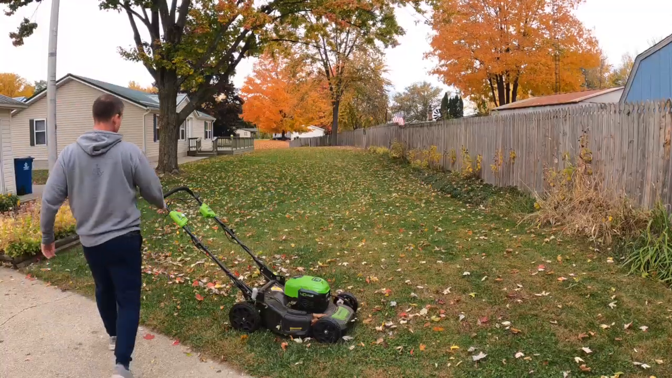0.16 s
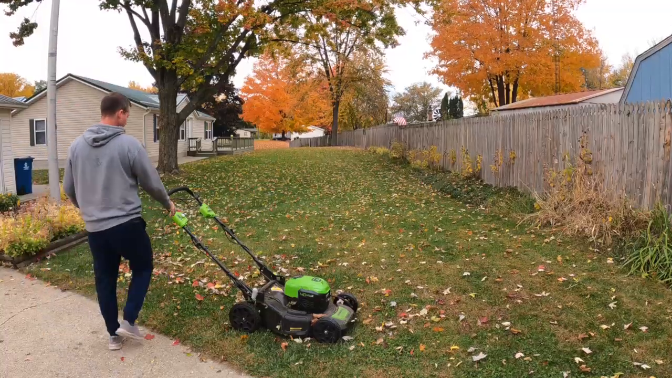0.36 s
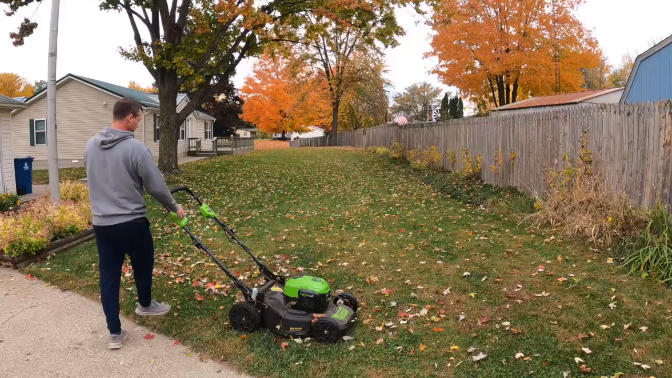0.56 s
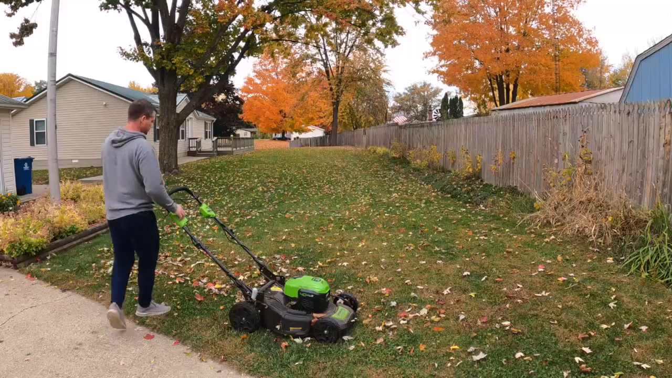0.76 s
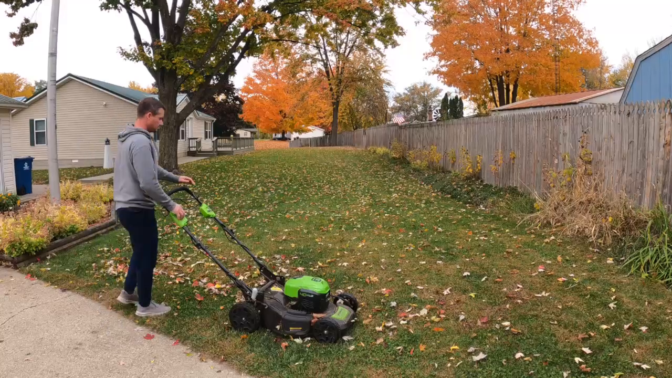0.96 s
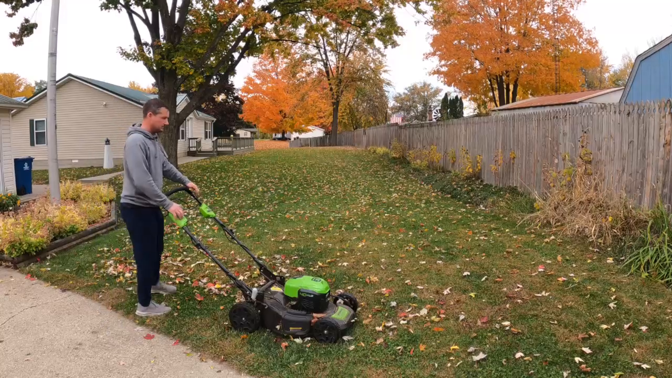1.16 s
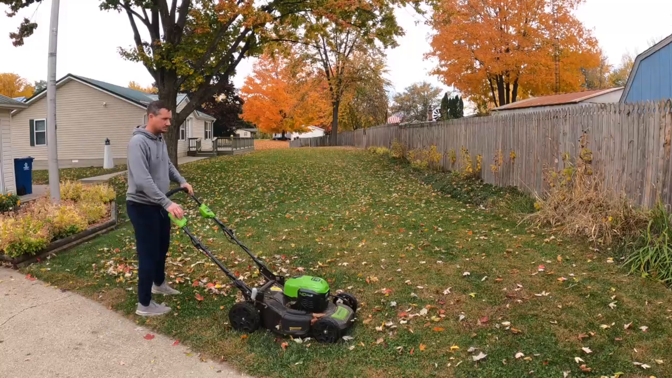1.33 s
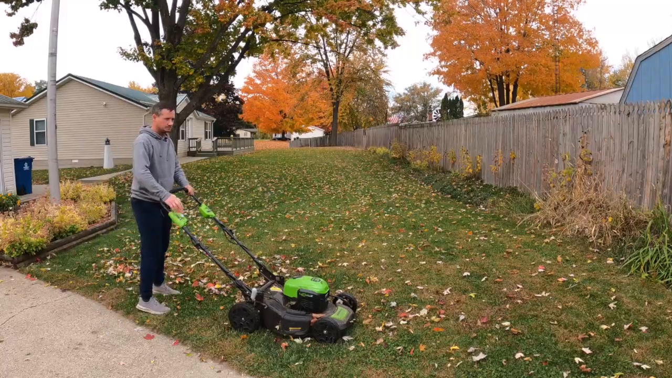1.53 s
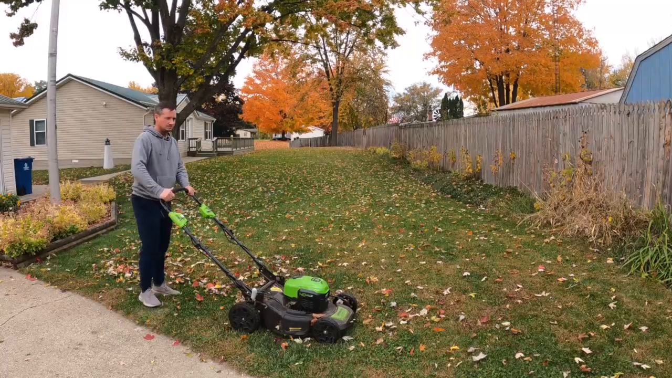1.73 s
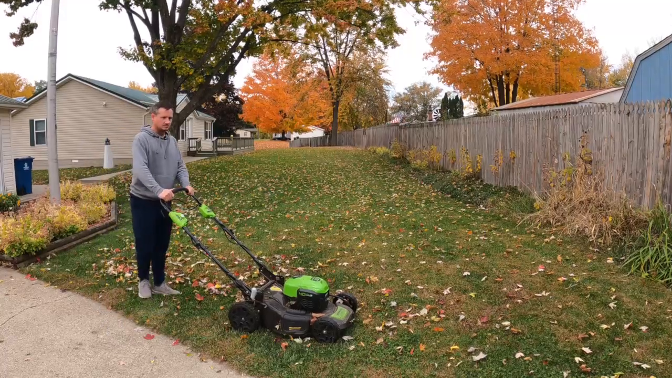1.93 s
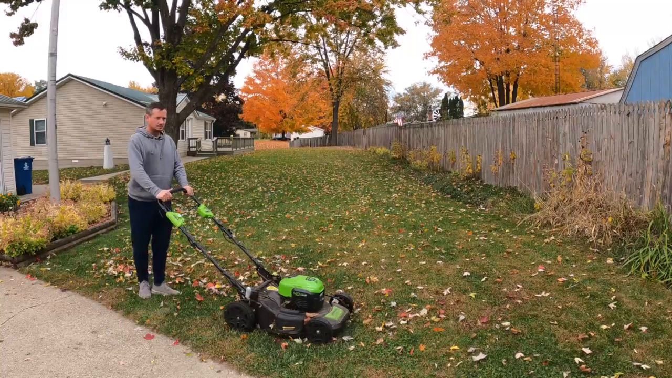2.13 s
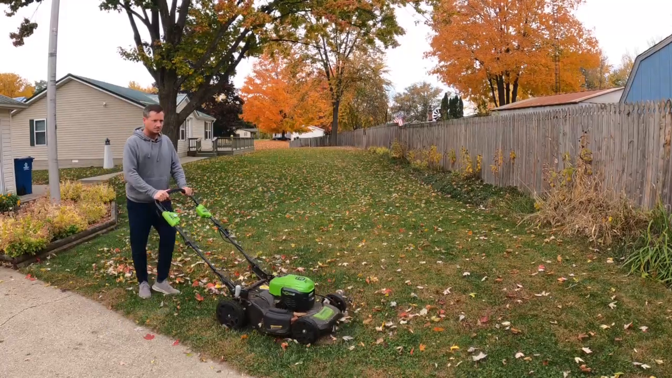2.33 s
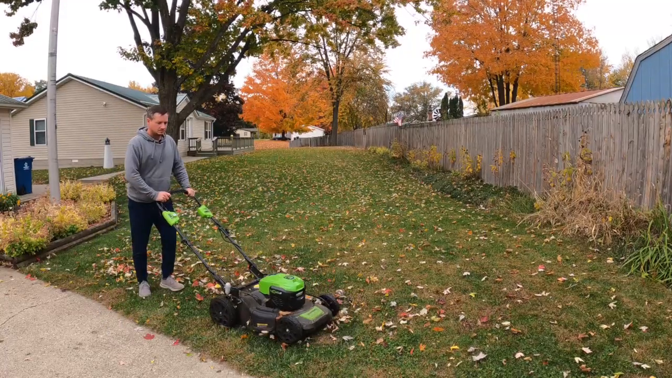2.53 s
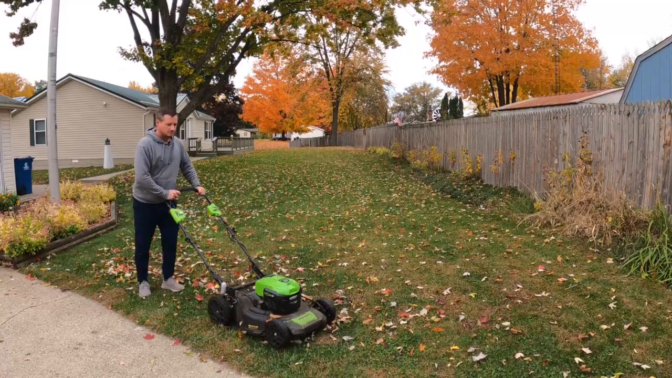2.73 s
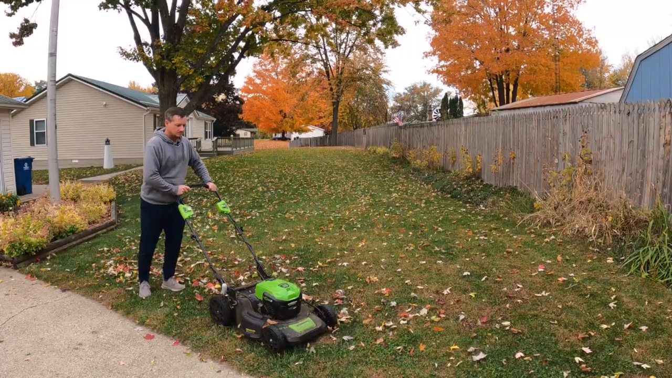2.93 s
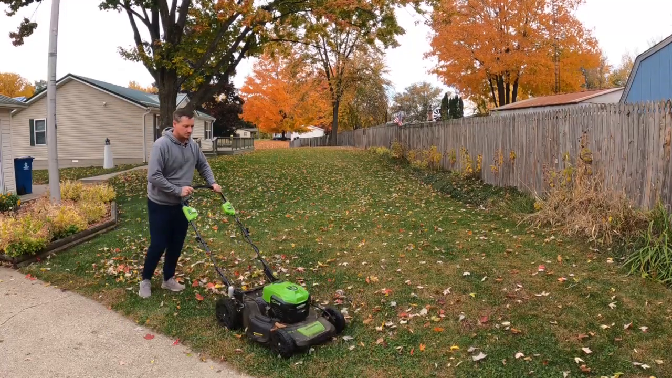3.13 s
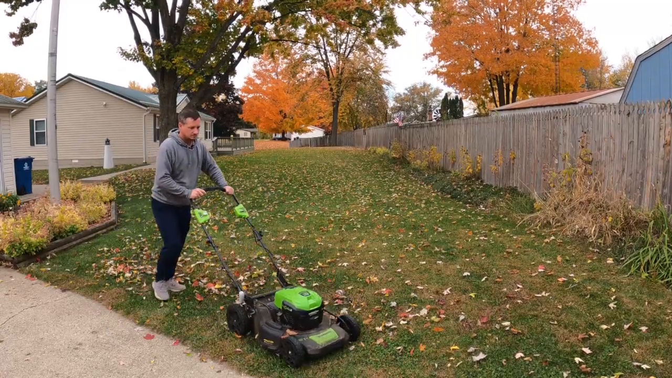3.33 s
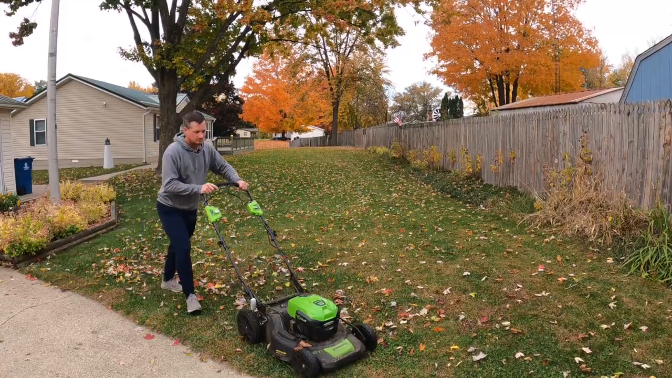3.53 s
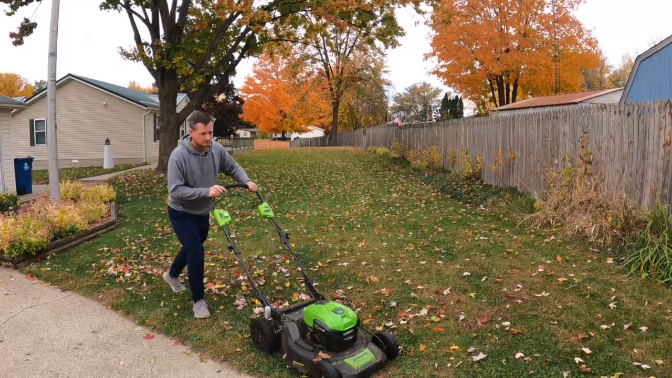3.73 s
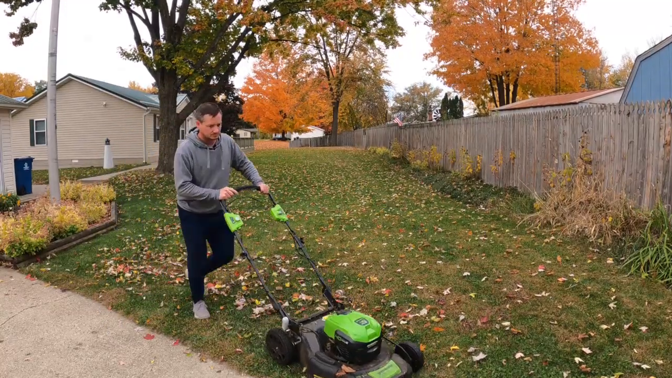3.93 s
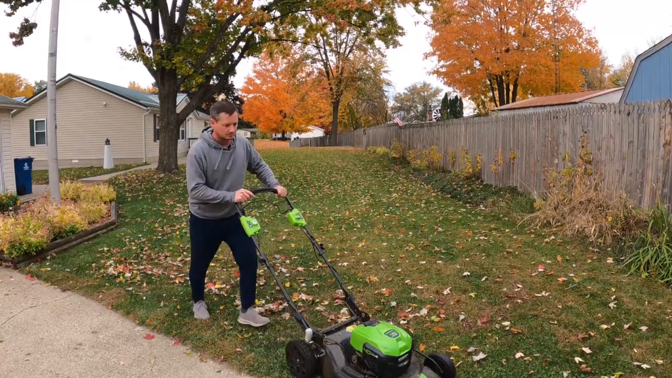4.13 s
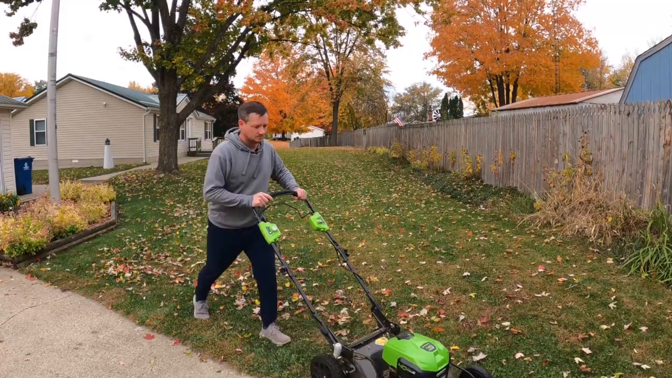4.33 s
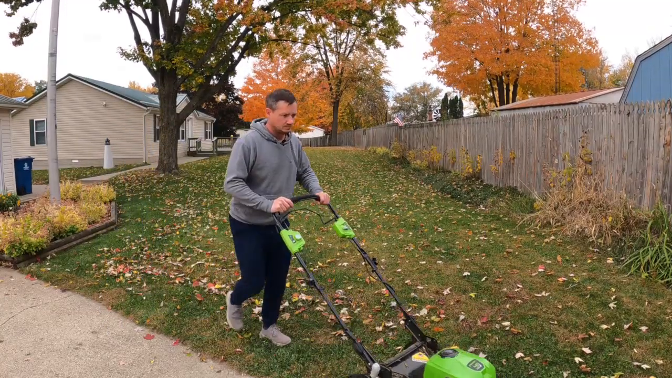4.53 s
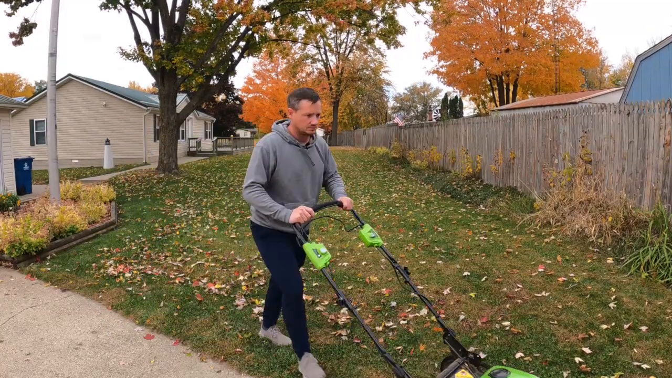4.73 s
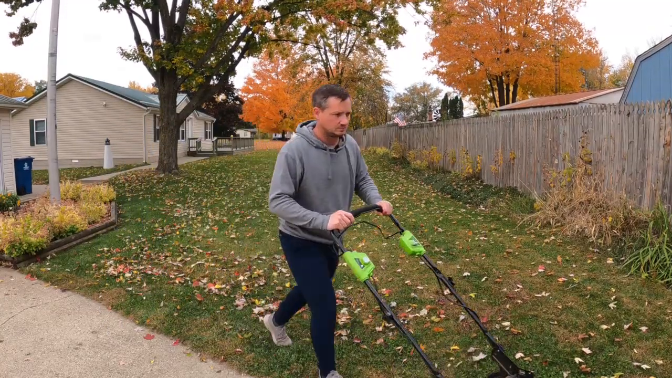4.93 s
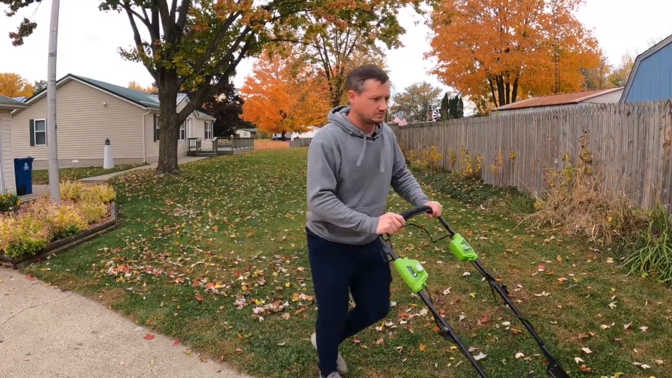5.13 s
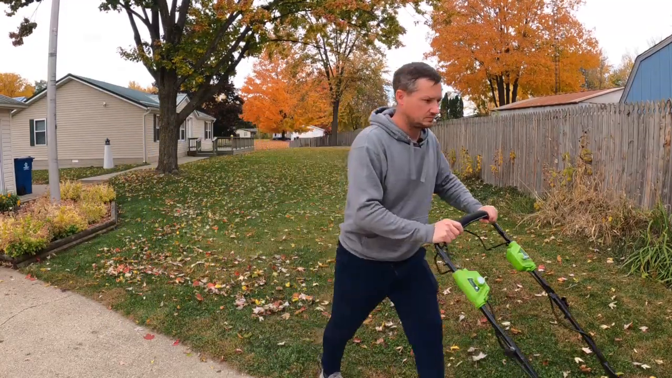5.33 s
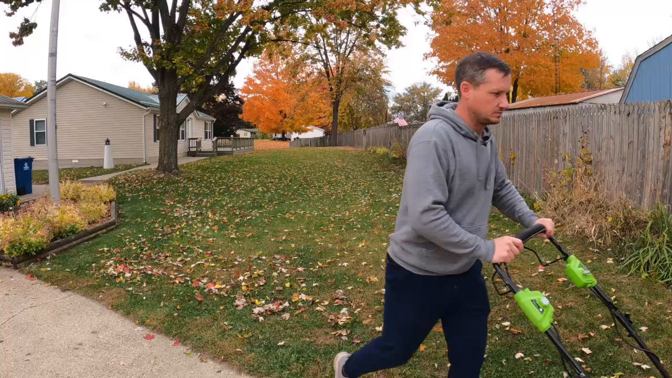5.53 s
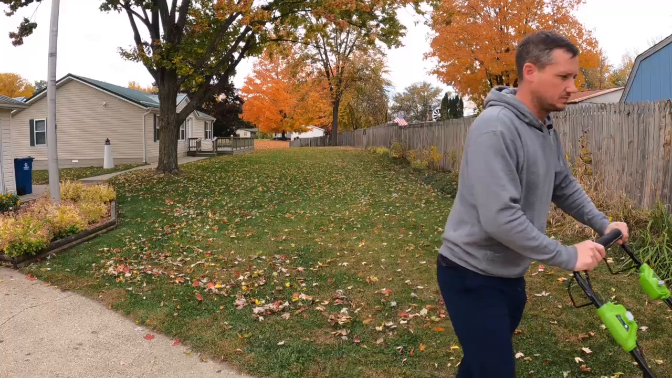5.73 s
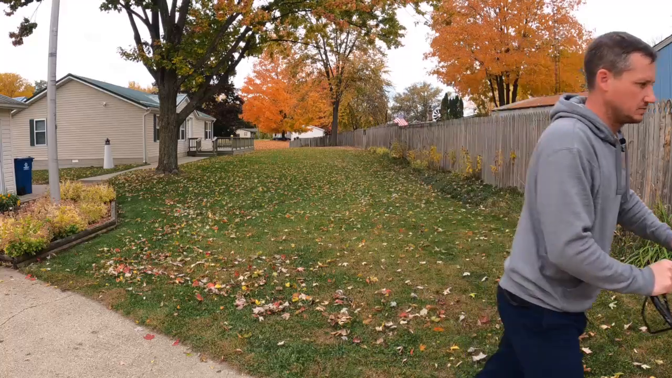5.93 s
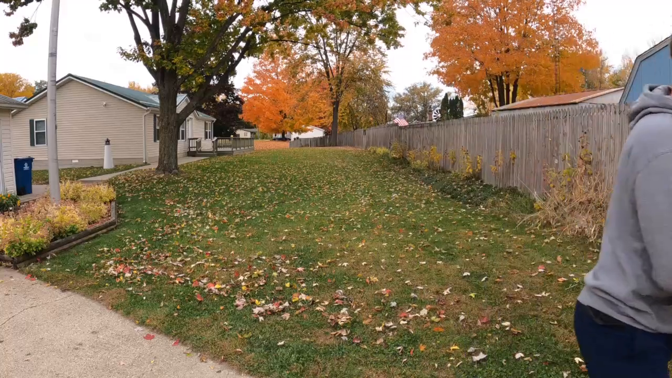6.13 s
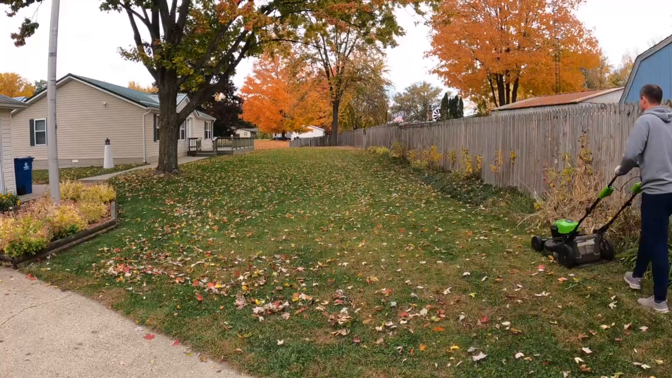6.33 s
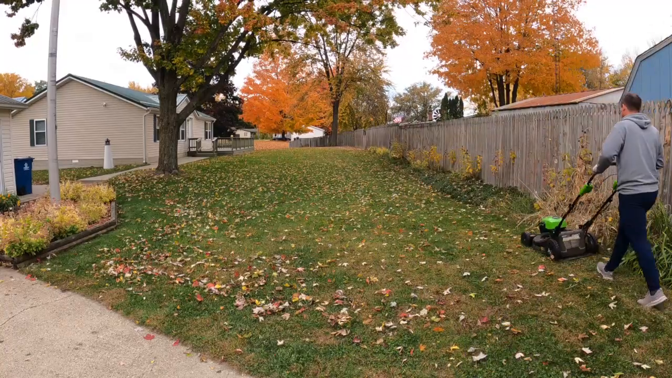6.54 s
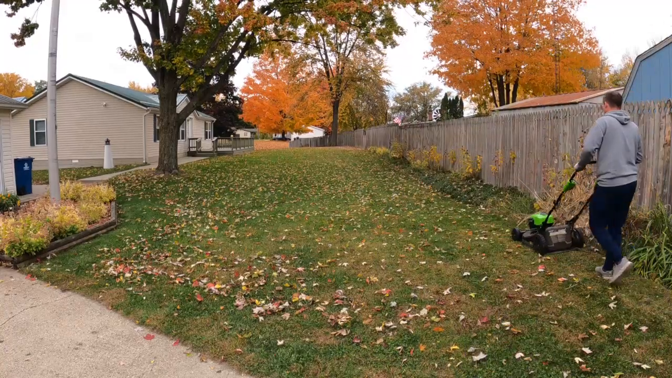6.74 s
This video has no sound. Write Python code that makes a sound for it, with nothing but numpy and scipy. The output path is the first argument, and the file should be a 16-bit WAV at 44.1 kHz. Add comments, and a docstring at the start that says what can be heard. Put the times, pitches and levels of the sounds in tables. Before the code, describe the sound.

A quiet outdoor hush with soft low rumbles opens the scene. A shoe scuffs a gritty path right at the start, and another lands with a tiny squeak at about 0.9 seconds. A mower handle gives a few faint ticks, then a cluster of sharper clicks around 1.4 to 1.7 seconds. From about 2 seconds a battery lawn mower starts with a pulsing whirr and a faint, very high whine. Dry leaves begin to rattle and snap at around 2.7 seconds. From 3 seconds a low hum sets in, rising in pitch and loudness with a rush of air until it levels off near 5 seconds. The mower runs loudest close to the microphone, with constant crackling and sharp cracks of leaves and twigs. At about 6.2 seconds it abruptly sounds a little farther off, still humming and chopping until the end, near 6.8 seconds.

```python
"""Battery mower on a leafy lawn

Over low rumbles and a neighbourhood hush, two steps scuff the path and the handle bail clicks. The motor whines
and the blade spins up: it hums at its passing rate, drives turbulent air under the deck and chops dry leaves.
The mower rolls past a low microphone; at 6.24 s its sound changes abruptly."""
import sys
import numpy as np
from scipy import signal
from scipy.io import wavfile
from scipy.ndimage import uniform_filter1d

SR = 44100
rng = np.random.default_rng(int(sys.argv[2]) if len(sys.argv) > 2 else 0)


def master(y):
    """Save y as 16-bit WAV."""
    cut = np.clip(np.atleast_2d(y).T, -1, 1)
    pcm = np.round(cut * 32767)  # scale
    wavfile.write(sys.argv[1], SR, pcm.astype(np.int16))


N = 298989
TIME = np.arange(N) / SR

# The running mower, one table before and one after the abrupt change at 6.24 s. Each row: time in seconds,
# blade passing rate in Hz, levels in dB of the second harmonic, the third harmonic and the air rush.
MOWER = [
    [(1.9, 8, -80, -80, -69.5), (2.3, 15, -75, -75, -54), (2.65, 26, -65, -65, -44.5),
     (2.85, 27.5, -60, -58, -37.5), (3.12, 43.3, -52, -54, -36.5), (3.27, 50.5, -51.5, -41, -34.5),
     (3.52, 61.8, -40, -36, -32), (3.7, 65.7, -36.5, -32, -30.5), (3.9, 74.4, -37, -31.5, -30.5),
     (4.3, 83.4, -28.5, -26, -28.5), (4.75, 90.7, -24, -30.5, -27), (5.1, 92.6, -22.5, -28.5, -27.5),
     (5.45, 94.3, -22.5, -32, -25), (5.85, 94.8, -23.5, -33, -27), (6.236, 96.2, -25.5, -31.5, -25.5)],
    [(6.244, 93.6, -29, -26.5, -28), (6.5, 94.6, -27, -25.5, -26), (6.6, 94.3, -31, -24.5, -26.5),
     (6.78, 94, -27, -26.5, -27.5)],
]


def amp(db):
    return 10 ** (np.asarray(db) / 20)


def unit_rms(x):
    return x / np.sqrt(np.mean(x ** 2) + 1e-20)


def unit_peak(x):
    return x / abs(x).max()


def curve(rows):
    """Interpolates each column after the first (time) at every sample."""
    times, *columns = np.vstack(rows).T
    return [np.interp(TIME, times, column) for column in columns]


def add(mix, start, sound):
    part = mix[round(start * SR):][:len(sound)]
    part += sound[:len(part)]


def swells(rows):
    """Sum of Gaussian bumps. Each row: centre and length in seconds, height."""
    return sum(height * np.exp(-(2 * (TIME - s) / length) ** 2) for s, length, height in rows)


def wander(per_s):
    """Slow random modulation with an rms near 0.5."""
    count = int(N / SR * per_s) + 3
    knots = rng.standard_normal(400)[:count]
    return 0.61 * np.interp(np.linspace(0, count - 1, N), np.arange(count), knots)


def colour(x, spectrum, patchy_db=0., size=512):
    """Spectral shaping to unit rms, with drifting patches of louder and softer bands."""
    hz, _, z = signal.stft(x, SR, nperseg=size, noverlap=size * 3 // 4)
    knots_hz, knots_db = np.transpose(spectrum)
    shape_db = np.interp(np.log(hz + 1), np.log(knots_hz + 1), knots_db, -90, -90)
    patches = uniform_filter1d(rng.standard_normal(z.T.shape), size=10, axis=0)
    patches = unit_rms(uniform_filter1d(patches, size=8, axis=1)).T
    z = z * amp(shape_db[:, None] + patchy_db * patches)
    return unit_rms(signal.istft(z, SR, nperseg=size, noverlap=size * 3 // 4)[1][:N])


def band(x, hz, width):
    """A resonator of unit gain with a fixed or moving centre."""
    carrier = np.exp(2j * np.pi * np.cumsum(hz * np.ones(len(x))) / SR)
    pole = np.exp(-np.pi * width / SR)
    return 2 * (carrier * signal.lfilter([1 - pole], [1, -pole], x / carrier)).real


def steep_band(x, hz, width):
    """Two resonators in cascade give steeper skirts."""
    return band(band(x, hz, width), hz, width)


def burst(rise, t60):
    """Impact excitation: noise that rises quickly and decays exponentially."""
    t = np.arange(8000) / SR
    envelope = (1 - np.exp(-t / rise)) ** 2 * amp(-60 * t / max(t60, .005))
    return rng.standard_normal(len(t)) * envelope / 5.48


def crackle(density, hz, width):
    """Shot noise: short grains, a few of them large, excite one resonance."""
    sizes = amp(3.2 * np.minimum(rng.exponential(1, N), 4))
    impulses = sizes * (rng.random(N) < 350 * density / SR)
    grains = signal.oaconvolve(impulses, np.hanning(130) ** 2)[:N] * rng.standard_normal(N)
    return unit_rms(band(grains, hz, width))


def neighbourhood():
    """Ambient noise: a broadband hush, strongest in the bass."""
    # Each row: time in seconds, level in dB before a 3 dB cut.
    levels = [(0.0, -51), (0.37, -47.5), (0.47, -50), (1.22, -50), (1.4, -46), (1.51, -48), (1.66, -51.5),
              (1.98, -51.5), (2.17, -50.5), (2.4, -50)]
    # Each row: frequency in Hz, relative spectral density in dB.
    spectrum = [(59, -31), (100, -2.5), (160, -10), (389, -11.5), (570, -11.5), (1230, -16), (1450, -18),
                (1580, -18.5), (2470, -23.5), (16000, -34)]
    return amp(curve(levels)[0] - 3) * colour(rng.standard_normal(N), spectrum, patchy_db=2.5, size=1024)


def low_rumble():
    """Modulated noise: low rumbles and thuds, from wind and probably footsteps, over a steady breeze."""
    # Each row: centre in seconds, length in seconds, level in dB.
    rumbles = [(.37, 0.11, -46.5), (0.51, 0.056, -44), (.66, 0.064, -43), (.8, 0.053, -48),
               (0.887, 0.037, -38.5), (1.207, 0.23, -49.5), (1.61, .2, -50.5), (1.862, .12, -56),
               (2.022, 0.038, -64), (2.517, 0.23, -68), (2.965, 0.17, -48), (3.056, 0.046, -48),
               (3.13, .07, -44)]
    # Each row: frequency in Hz, relative spectral density in dB.
    spectrum = [(12, -37), (20, 2.5), (65, 0.5), (91, -0.5), (161, -17.5), (184, -17), (300, -19.5),
                (390, -52), (660, -120)]
    strength = amp(-60) + swells((s, length, amp(db)) for s, length, db in rumbles)
    return strength * colour(rng.standard_normal(N), spectrum, size=4096)


def stereo_hiss():
    """Decorrelation gives width: faint hiss and low rumble that differ left and right."""
    # The hiss fades as the mower grows loud. Each row: time in seconds, level in dB.
    levels = [(0, -57), (2.3, -57), (2.5, -58.5), (2.75, -58), (2.85, -74), (6.78, -89)]
    # Each row: frequency in Hz, relative spectral density in dB.
    spectrum = [(12, -29), (20, 1), (65, -18), (104, -14), (328, -18.5), (574, -21), (678, -20),
                (14700, -34), (16000, -34)]
    hiss = amp(curve(levels)[0]) * colour(rng.standard_normal(N), spectrum, size=2048)
    rumble = amp(-68) * unit_rms(steep_band(rng.standard_normal(N), hz=32, width=40))
    return hiss + rumble


def footsteps():
    """Friction: soles scuff grit on the path, and one squeaks as it lands."""
    # Each row: start in seconds, sole peak in dB, grit relative to it in dB, 60 dB decay time and
    # rise time in seconds, sole resonance in Hz.
    steps = [(0.126, -33, -2, 0.11, 0.01, 1660), (0.16, -49.5, 6.5, 0.23, 0.0071, 1520),
             (.897, -24.5, -9, 0.019, 0.0033, 2240), (0.903, -26, -11, 0.12, 0.00055, 1130)]
    # Each row: start and length in seconds, pitch in Hz, level in dB.
    squeaks = [(0.875, 0.023, 3030, -39.5), (0.917, 0.018, 3080, -49)]
    out = np.zeros(N)
    for start, db, grit_db, t60, rise, hz in steps:
        puff = burst(rise, t60)
        sole = steep_band(puff, hz, 1800)
        grit = steep_band(puff, 7300, 4500) + 0.47 * steep_band(puff, 11200, 5000)
        grit += 0.95 * steep_band(puff, 4560, 1600)
        add(out, start, amp(db) * (unit_peak(sole) + amp(grit_db) * unit_peak(grit)))
    for start, length, hz, db in squeaks:
        t = np.arange(round(length * SR)) / SR
        pitch = hz * (1 + 0.022 * np.sin(np.pi * t / length))
        phase = 2 * np.pi * np.cumsum(pitch) / SR
        tone = sum(amp(-11 * k) * np.sin((k + 1) * phase) for k in range(3))
        add(out, start, amp(db) * tone * np.hanning(len(t)))
    return out


def handle():
    """Modal ringing: each click of the bail excites the handle, whose high modes die sooner."""
    # Each row: start in seconds, peak of the low modes in dB, relative treble in dB before a 10.5 dB
    # lift and extra damping, 60 dB decay time in seconds, factor on the mode frequencies.
    clicks = [(0.526, -41, -26.5, 0.032, 0.69), (0.8, -43, -19, 0.05, 0.86), (1.358, -34, -12, 0.058, 1),
              (1.366, -35, -20, 0.05, 1.26), (1.428, -23.5, -15.5, 0.05, 1),
              (1.444, -35.5, -26, 0.13, 0.61), (1.459, -46, -10, 0.03, 0.98), (1.472, -39, -9, 0.031, 0.93),
              (1.536, -45, -26, 0.041, 1.35), (1.6, -27.5, -26, 0.061, 0.88),
              (1.624, -18.5, -21, 0.055, 0.92), (1.655, -39, -17, 0.062, 1),
              (1.917, -42.5, -23, 0.064, 0.82)]
    # Each row: mode frequency in Hz, bandwidth in Hz, relative level in dB.
    modes = [(577, 140, -7), (1286, 590, 3), (1650, 580, -2.5), (2080, 160, -28), (2730, 310, -10.5),
             (4900, 1950, 4.5), (6000, 860, -5), (8600, 2900, -3.5), (12000, 3300, -8)]
    out = np.zeros(N)
    for start, db, treble_db, t60, factor in clicks:
        puff = burst(0.0007, t60)[:4000]
        low, high = np.zeros((2, len(puff)))
        for hz, width, mode_db in modes:
            group = high if hz > 3500 else low
            group += amp(mode_db) * steep_band(puff, hz * factor, width) / np.sqrt(width)
        high *= amp(-60 * np.arange(len(high)) / SR / 0.11)  # a further 60 dB down in 0.11 s
        add(out, start, amp(db) * (unit_peak(low) + amp(treble_db + 10.5) * unit_peak(high)))
    return out


def motor():
    """Switching in the drive makes a rough whine; the deck resonates in pulses while the shaft is slow."""
    # Each row: centre and length in seconds, resonance in Hz, level in dB before a 10.5 dB cut.
    pulses = [(2.11, .06, 710, -44), (2.272, 0.068, 855, -40.5), (2.39, 0.037, 760, -40),
              (2.528, 0.076, 800, -38), (2.687, 0.14, 864, -33), (2.837, 0.11, 730, -29),
              (2.98, 0.17, 850, -32), (3.098, 0.048, 830, -30)]
    # Each row: time in seconds, level in dB.
    whine_levels = [(2.3, -90), (2.4, -63), (3, -60), (3.95, -58.5), (4.05, -64), (4.6, -64), (5, -72),
                    (5.3, -90)]
    switching_hz = 12001
    rush_db = curve(MOWER)[-1]
    whirr = amp(rush_db - 16) * np.clip((3.2 - TIME) / .15, 0, 1)  # the drone between pulses
    pulsing = swells((s, length, amp(db - 10.5)) for s, length, _, db in pulses)
    deck_hz, = curve([(s, hz) for s, _, hz, _ in pulses])
    drone = (pulsing + whirr) * unit_rms(steep_band(rng.standard_normal(N), deck_hz, 116))
    whine = np.sqrt(2) * np.sin(2 * np.pi * switching_hz * TIME + .3 * wander(per_s=45))
    return drone + amp(curve(whine_levels)[0] + 2.8 * wander(per_s=55)) * whine


def leaf_rattle():
    """Many small impacts: shreds whirl round the deck in clumps, coarse ones lower, fine ones higher."""
    # Each row: time in seconds, level in dB.
    levels = [(2.1, -69), (2.36, -58.5), (2.42, -52), (2.62, -48), (2.84, -39), (2.95, -44), (3.15, -43.5),
              (3.3, -39), (3.52, -42), (3.62, -39.5), (3.8, -41), (4.3, -41.5), (4.75, -37), (5.7, -38),
              (6.08, -41), (6.16, -37.5), (6.236, -35.5), (6.244, -48), (6.29, -47), (6.32, -42),
              (6.78, -41)]
    # Each row: frequency in Hz, relative gain in dB.
    spectrum = [(300, -10), (1000, 2), (2000, -16.5), (3200, 0), (4200, 1), (5500, 2), (7500, 1),
                (10000, -2), (12500, 1), (14500, -1), (16000, -10)]
    density = amp(2 * wander(per_s=58))
    hiss = 0.66 * density * rng.standard_normal(N)
    coarse = 0.28 * crackle(density, hz=4550, width=4400)
    fine = 0.36 * crackle(density, hz=8800, width=6900)
    return amp(curve(levels)[0]) * colour(hiss + coarse + fine, spectrum, patchy_db=2, size=256)


def leaf_snaps():
    """Brittle fracture: dry leaves and twigs break with a bright crack and a lower knock."""
    # Each row: time in seconds, crack peak in dB, brightest frequency in Hz, relative knock level
    # in dB before a 7.5 dB cut.
    snaps = [(2.6895, -23.5, 5200, -18.5), (2.7545, -23, 10600, -17), (2.8113, -23.5, 5690, -2),
             (2.8569, -18, 4290, -15), (2.8838, -28, 5490, -14), (2.901, -19, 5540, -19),
             (2.967, -43, 12000, -10), (3.0799, -28, 12100, -6), (3.1116, -20.5, 9240, 0),
             (3.2246, -26, 4650, -11), (3.355, -22, 5720, -11), (3.3863, -24.5, 9660, -9),
             (3.4258, -22.5, 4550, 4), (3.484, -21, 5540, 1), (3.506, -24, 5100, -16),
             (3.6176, -18, 5940, -8), (3.7276, -25, 4570, -6), (3.913, -22.5, 5590, -6),
             (4.2693, -21, 10380, -6), (4.4004, -20.5, 6410, -11), (4.4564, -28, 4143, -6),
             (4.6228, -22.5, 4866, -2), (4.7614, -23, 5340, -4), (4.7735, -20, 5210, -4),
             (4.8351, -26, 5414, 0), (4.8469, -14, 9760, 2), (4.9117, -22, 6870, -2),
             (4.953, -20, 5730, -4), (4.9661, -21.5, 6245, 4), (4.996, -24, 6290, -4),
             (5.0104, -23, 5930, 1), (5.0195, -14, 5000, -12), (5.0933, -19, 12300, 7),
             (5.114, -24, 4720, -6), (5.1262, -18, 6310, -6), (5.206, -19.5, 5774, -6),
             (5.2804, -16.5, 4844, 5.5), (5.3772, -23.5, 4860, -6), (5.4628, -25, 6165, -3),
             (5.5297, -21, 4520, 1), (5.5628, -16.5, 4900, 3), (5.6171, -22.5, 11000, -8),
             (5.691, -21, 4454, -9), (5.7422, -21, 5174, -2), (5.8489, -11, 5400, -12),
             (6.0237, -25, 12100, -11), (6.0666, -24, 4020, -9), (6.1535, -22, 5450, -6),
             (6.1669, -8.5, 7070, -3), (6.4113, -22, 4850, -13), (6.6444, -22.5, 11420, -4),
             (6.7264, -18.5, 9085, -6)]
    out = np.zeros(N)
    for s, db, hz, knock_db in snaps:
        t60 = 0.016 * np.exp(-0.07 * (db + 16.5))  # louder snaps are drier
        puff = burst(0.0013, t60)[:2000]
        crack = unit_peak(4 * steep_band(puff, hz, 2400) + 1.66 * steep_band(puff, 7000, 8000))
        knock = unit_peak(steep_band(puff, 1360, 1250))
        add(out, s - .001, amp(db) * (crack + amp(knock_db - 7.5) * knock))
    return out


def rotor_hum(phase):
    """Periodic forcing: blade tips beat the air, and the motor poles sing at 12 times their rate."""
    # The lowest blade tone. Each row: time in seconds, level in dB.
    fundamental = [(3, -65), (3.5, -55), (3.7, -46), (4.3, -41.5), (4.8, -36.5), (5.2, -39.5), (5.8, -40),
                   (6.236, -43), (6.244, -35), (6.78, -34)]
    # Further tones of blade and shaft. Each row: multiple of the passing rate, level in dB over the rush at
    # full speed before and after 6.24 s, scale of the wavering in dB.
    shaft_tones = [(1.5, -21, -33, -8), (4, -14.5, -23, 8), (6, -13.5, -14, 5)]
    # Response of the housing to the poles. Each row: frequency in Hz, level in dB before 6.24 s.
    housing = [(450, -54), (650, -47), (760, -41.5), (920, -46), (970, -51), (1130, -47)]
    hz, second_db, third_db, rush_db = curve(MOWER)
    after_change = TIME > 6.24  # from here the mower's sound changes abruptly
    poles_hz = 12 * hz
    poles_db = np.interp(poles_hz, *np.transpose(housing)) + 4.5 * after_change
    shaft_db = rush_db + 7 * np.log2(hz / hz[-1])  # gains 7 dB on the rush per doubling of speed
    tones = [(k, shaft_db + np.where(after_change, late_db, early_db), waver_db)
             for k, early_db, late_db, waver_db in shaft_tones]
    tones += [(1, curve(fundamental)[0], 2.5), (2, second_db, 1.5), (3, third_db, 3.5),
              (12, poles_db, 4), (13, poles_db - 3, 4), (5, third_db + np.where(after_change, -11, -7), 3)]
    hum = np.zeros(N)
    for k, db, waver_db in tones:
        level = amp(db + waver_db * wander(per_s=25))
        jitter = 0.14 * np.sqrt(k) * wander(per_s=22)
        hum += level * np.sin(k * phase + jitter + 7 * rng.random())
    fuzz = amp(poles_db + 4.5) * unit_rms(steep_band(rng.standard_normal(N), poles_hz, 110))
    return np.sqrt(2) * hum + fuzz


def deck_rush():
    """Turbulence: air rushes under the deck and the blade whips the grass; both swell at each clump."""
    # Spectra of the air and the whipped grass. Each row: frequency in Hz, relative density in dB.
    air_spectrum = [(30, -45), (55, -45), (90, -23), (170, 0.5), (300, 0), (600, -2), (900, -12),
                    (1300, -52)]
    whip_spectrum = [(600, -6.5), (950, 1), (1500, -1), (2200, -13.5), (3200, -23), (6000, -36)]
    # Leaves and grass caught by the blade. Each row: time in seconds, rise of rush and of whip in dB.
    clumps = [(1.925, 19, 14), (2.1, 8, 21), (2.3, 7, 14), (2.7, 7.5, 8), (2.79, 8, 3), (2.86, 7.5, 1),
              (3.12, 9.5, 1), (3.23, 4, 4.5), (3.3, 5, 4.5), (3.732, 5, 8.5), (4.8, -2, 5), (6.11, 4.5, -2),
              (6.16, 2.5, 1.5), (6.245, 6.5, -1.5), (6.481, 3, 4), (6.51, 1, 8.5), (6.63, 0, 4.5)]
    clump_s = 0.023
    rush_db = curve(MOWER)[-1]
    air_db = rush_db + swells((s, clump_s, db) for s, db, _ in clumps)
    whip_db = -33.5 + 1.16 * (rush_db + 28) + swells((s, clump_s, db) for s, _, db in clumps)
    air = amp(air_db) * colour(rng.standard_normal(N), air_spectrum, patchy_db=1, size=1024)
    whip = amp(whip_db) * colour(rng.standard_normal(N), whip_spectrum, patchy_db=1)
    return air + whip


def blade():
    """Amplitude modulation: as the hum sets in, the rush throbs with each pass of a blade tip."""
    phase = 2 * np.pi * np.cumsum(curve(MOWER)[0]) / SR
    onset = np.clip((TIME - 2.85) / 0.13, 0, 1)
    hum, rush = rotor_hum(phase), deck_rush()
    throb = (1 + 0.17 * onset * np.cos(phase)) * amp(0.68 * wander(per_s=35))
    return onset * hum + throb * rush


def ground(x):
    """Ground effect and directivity: two hollows drift, and the top dulls as the deck turns away."""
    # Each row: time in seconds, centre in Hz and gain in dB of the low hollow, the same for the high
    # hollow, gain in dB above about 13 kHz.
    hollows = [(2.3, 3370, -21, 7350, -6, -3), (2.8, 3250, -15.5, 7650, -8, -7),
               (3.3, 3360, -7.5, 7800, -3.5, -5), (4, 3050, -18, 8000, -5.5, -6),
               (4.5, 3290, -14, 8600, -10, -8.5), (4.75, 3400, -14, 8200, -7.5, -8),
               (5, 3251, -6.5, 8000, -4.5, -4), (5.85, 3120, -10.5, 7800, -4.5, -6),
               (6.236, 3200, -6.5, 7740, -3.5, -7), (6.244, 3520, -3, 9516, 0.5, -3),
               (6.78, 3500, -6.5, 9815, 2, -2)]
    hz, t, z = signal.stft(x, SR, nperseg=512, noverlap=384)
    hz = hz[:, None]
    frames = np.minimum((t * SR).astype(int), N - 1)
    low_hz, low_db, high_hz, high_db, top_db = (column[frames] for column in curve(hollows))
    gain_db = low_db * np.exp(-((hz - low_hz) / 550) ** 2)
    gain_db += high_db * np.exp(-((hz - high_hz) / 800) ** 2)
    gain_db += top_db * np.clip((hz - 12000) / 2200, 0, 1)
    return signal.istft(z * amp(gain_db), SR, nperseg=512, noverlap=384)[1][:N]


def scene():
    """Superposition: the sources add in the centre, the stereo hiss in opposite phase left and right."""
    background = low_rumble() + neighbourhood()
    mower = ground(blade() + leaf_rattle() + leaf_snaps() + motor())
    mid = mower + handle() + footsteps() + background
    side = stereo_hiss()
    return np.array([mid + side, mid - side])


def record(dry):
    """Band limiting: a steep low-pass filter removes the highest treble."""
    lowpass = signal.firwin(1023, cutoff=15800, window=("kaiser", 9), fs=SR)
    return signal.oaconvolve(dry, lowpass[None], "same")


dry = scene()
out = record(dry)
master(out)
```